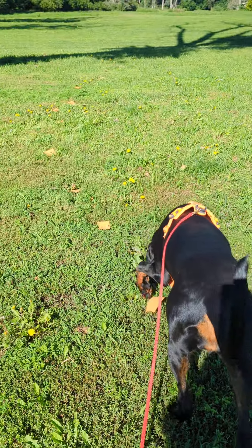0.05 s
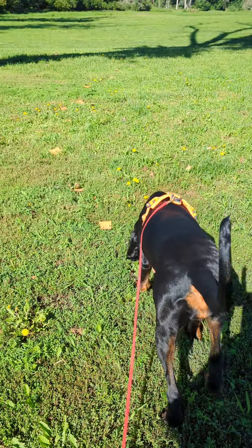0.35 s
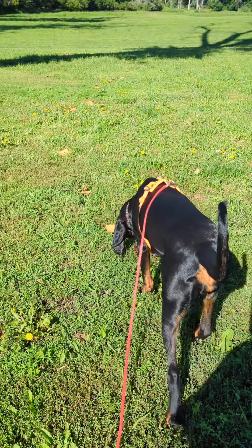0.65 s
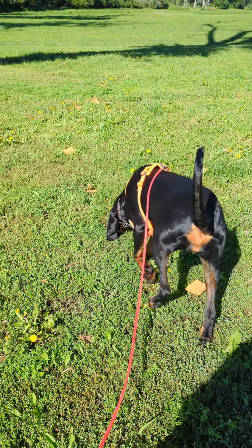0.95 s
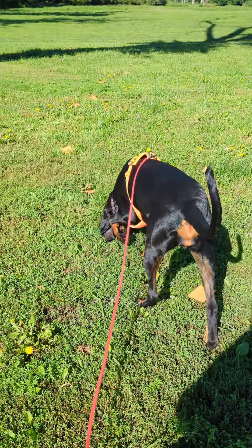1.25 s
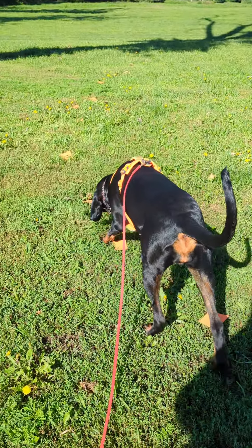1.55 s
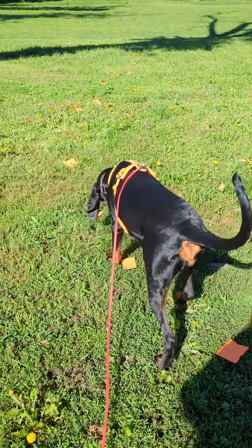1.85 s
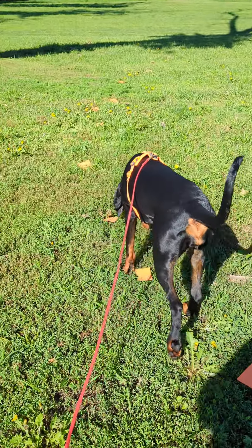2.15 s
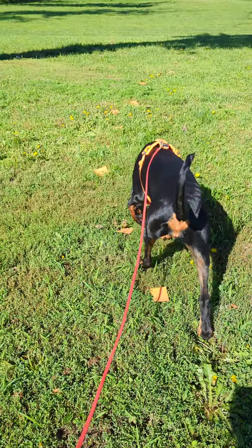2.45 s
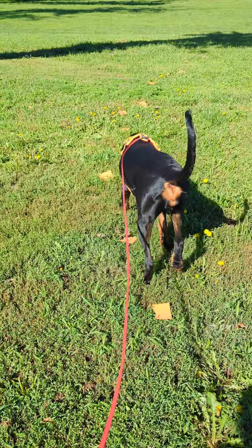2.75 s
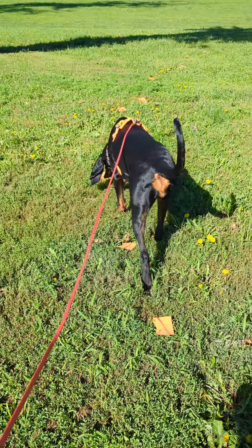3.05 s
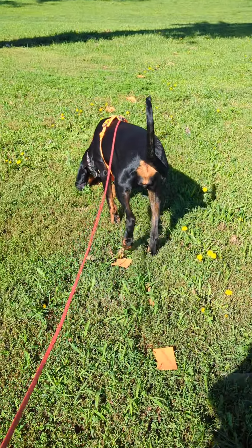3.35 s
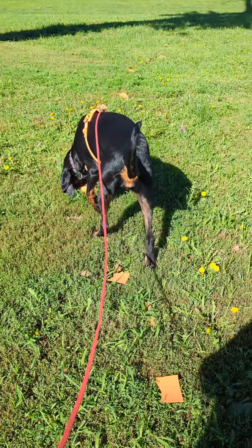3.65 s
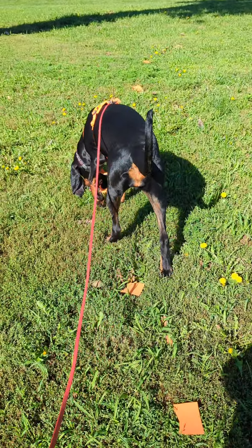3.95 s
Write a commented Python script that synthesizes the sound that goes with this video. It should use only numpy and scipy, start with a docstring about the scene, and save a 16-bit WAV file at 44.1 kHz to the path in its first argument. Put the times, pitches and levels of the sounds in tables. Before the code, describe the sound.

Paws and shoes swish softly through grass throughout, crunching most clearly around 2.2 seconds and again near 3.5. Leash and twigs tick near 0.1, 1.5, 3.3 and 4 seconds. Distant birds chirp early on; a nearer bird gives thin, buzzy whistles at about 2.1 seconds and from 3.1 to 3.4. Faint pulsing insects, light hiss and a steady low town rumble lie behind.

```python
"""A dog is walked across a park lawn: paws and shoes swish through the grass and a few steps crunch,
all made of tiny snaps on friction noise. Leash and twigs tick as short, damped bursts of noise.
A near bird gives thin, buzzy whistles on two gliding voices and one rising note; others chirp far off.
Behind them sit faint pulsing insects, the steady low rumble of the town, and a faint hiss with
continuous grass rustle; the rustle pauses briefly."""
import sys
import numpy as np
from scipy import signal
from scipy.fft import rfft, irfft
from scipy.io import wavfile
from scipy.ndimage import uniform_filter1d

SR = 44100
rng = np.random.default_rng(int(sys.argv[2]) if len(sys.argv) > 2 else 0)


def wrap_up_sound(samples):
    """Save the sound to the file named by the first command line argument, as 16-bit audio."""
    columns = np.atleast_2d(samples).T
    # keep every value between -1 and 1, then stretch to whole-number steps
    tamed = np.clip(columns, -1, 1)
    steps = np.round(tamed * 32767).astype(np.int16)
    wavfile.write(sys.argv[1], SR, steps)


N = 176400
TIME = np.arange(N) / SR

# a leg brushes the grass: middle_s, length_s, stems_db, blades_db
GRASS_SWISHES = [(.285, 0.03, -60.5, -62.5), (0.63, 0.17, -62, -64), (0.797, 0.067, -64.5, -62),
                 (1.113, 0.036, -60.5, -61.5), (1.415, 0.18, -69, -62), (1.905, 0.52, -63, -68),
                 (2.304, .1, -56.5, -54), (2.54, 0.14, -60.5, -64.5), (3.074, 0.19, -61.5, -54),
                 (3.316, 0.11, -62.5, -53.5), (3.58, 0.2, -58, -61.5), (3.933, 0.11, -59.5, -56.5)]
# colour of the dull stems: frequency_hz, gain_db
STEM_EQ = [(900, 0), (2200, 8.5), (8000, 1.5), (14000, -29)]
# colour of the crisp blades: frequency_hz, gain_db
BLADE_EQ = [(5000, -3), (7000, 3.5), (15500, -1)]
# the blades lean right: frequency_hz, left_minus_right_db
BLADE_BALANCE = [(8000, -2), (11000, -8.5)]
# a sole presses the turf: start_s, hold_s, level_db
FOOTSTEPS = [(.02, 0.096, -59), (2.216, 0.034, -49), (2.295, 0.042, -47.5), (2.6, 0.15, -59),
             (3.5, 0.085, -54.5), (3.93, .07, -56.5)]
# colour of the crunch: frequency_hz, gain_db
TURF_EQ = [(400, -2.5), (600, 2.5), (1200, -5), (2200, 0.5), (3200, -13), (7000, -12.5)]
# leash and twigs: start_s, level_db, centre_hz, width_octaves, t60_s
KNOCKS = [(0.13, -44.5, 3300, 2, .025), (1.241, -55, 950, 0.84, 0.059), (1.532, -40.5, 10800, 1.04, 0.014),
          (3.283, -38.5, 620, 0.39, 0.044), (3.962, -41.5, 12600, 0.85, .05)]
# the near bird, one curve per voice of each whistle: time_s, pitch_hz, level_db
WHISTLE_CURVES = [
    [(2.04, 6100, -63.5), (2.09, 7000, -54.5), (2.105, 7850, -50), (2.125, 7900, -41), (2.14, 7450, -57),
     (2.18, 7400, -66)],
    [(2.092, 8800, -61), (2.103, 8150, -45.5), (2.125, 8100, -42.5), (2.14, 8550, -40), (2.18, 8850, -60)],
    [(3.108, 5000, -51), (3.115, 6900, -46), (3.135, 6350, -49), (3.15, 5700, -53.5), (3.185, 5350, -50)],
    [(3.26, 6450, -65.5), (3.33, 6700, -45.5), (3.375, 6650, -38.5), (3.405, 7000, -36), (3.43, 7700, -37)],
    [(3.35, 8850, -56), (3.402, 8600, -47), (3.425, 8400, -35), (3.434, 8350, -52)],
]
# short chirps, distant but for the near bird's last one: start_s, length_s, start_hz, end_hz, level_db
BIRD_CHIRPS = [(0.24, 0.41, 6640, 6150, -68), (0.705, 0.034, 3590, 2630, -53.5),
               (1.028, 0.0083, 5040, 4460, -61), (1.102, 0.012, 5050, 4670, -62),
               (1.222, 0.164, 2400, 2504, -67.5), (1.726, 0.035, 3780, 2510, -56.5),
               (2.912, 0.015, 4460, 5740, -55)]
# insects: pitch_hz, arch_hz, bandwidth_hz, pulse_rate_hz, first_peak_s, sharpness, level_db
CHIRRS = [(9200, 520, 170, 4.16, .055, .6, -75), (8400, 0, 300, 16.667, .015, 4, -71),
          (7600, 0, 260, 16.667, .015, 4, -73)]
# colour of the town rumble: frequency_hz, gain_db
RUMBLE_EQ = [(33, -48), (42, -2), (52, 3), (70, 0), (95, -7), (120, -3.5), (160, -15.5), (255, -24.5),
             (350, -41.5)]
# colour of the far traffic: frequency_hz, gain_db
TRAFFIC_EQ = [(150, 2.5), (290, -27.5)]
# colour of the far low-mid wash: frequency_hz, gain_db
WASH_EQ = [(300, 6.5), (440, 6), (560, 13), (980, 14), (1250, -4)]
# fader ride of that wash: time_s, level_db
WASH_FADER = [(0, -77), (.25, -59), (.57, -58.5), (.95, -68.5), (1.42, -63), (1.7, -70.5), (2.9, -69.5),
              (3.4, -60.5), (4, -58.5)]
# colour of the faint hiss and continuous grass rustle: frequency_hz, gain_db
HISS_RUSTLE_EQ = [(250, -3.5), (420, -5.5), (560, 2.5), (950, -9.5), (1250, -5.5), (8500, -15),
                  (10500, -24), (16000, -22.5)]
# stereo image, centred lows and wide highs: frequency_hz, left_right_correlation
STEREO_IMAGE = [(140, .99), (300, 0.84), (600, 0.037), (1300, -0.065), (4000, -0.096)]


def walking(waver_db=2.0, waver_hz=35):
    """Paws and shoes cross the lawn; swishes and crunches waver in level."""
    return (grass_swishes() + turf_crunches()) * from_db(waver_db * drift(waver_hz))


def grass_swishes(steepness=4.5):
    """Legs rub past dull stems and crisp blades, each swish a bell-shaped swell."""
    power = np.zeros((2, N))
    for middle_s, length_s, stems_db, blades_db in GRASS_SWISHES:
        distance = np.abs(TIME - middle_s) / (length_s / np.sqrt(2))
        power += (from_db([[stems_db], [blades_db]]) / (1 + distance ** steepness)) ** 2
    stems, blades = np.sqrt(power)
    return stems * coloured(crackle(), STEM_EQ) + blades * coloured(crackle(), BLADE_EQ, BLADE_BALANCE)


def turf_crunches(attack_s=.001, release_s=.04):
    """A sole crushes the turf: the crunch bites, holds and dies away."""
    power = np.zeros(N)
    for start_s, hold_s, db in FOOTSTEPS:
        age = TIME - start_s
        envelope = np.clip(age / attack_s, 0, 1) * np.exp(-np.maximum(age - hold_s, 0) / release_s)
        power += (from_db(db) * envelope) ** 2
    return np.sqrt(power) * coloured(crackle(), TURF_EQ) * pan(db=-3)


def crackle(snaps_per_s=1500, spread_db=2.5, friction_share=.4):
    """Dense tiny snaps of uneven size on smooth friction noise."""
    sizes = from_db(spread_db * np.minimum(rng.exponential(1, (2, N)), 5))
    signs = rng.choice([-1, 1], (2, N))
    snaps = rms_one(sizes * signs * (rng.random((2, N)) < snaps_per_s / SR))
    return np.sqrt(1 - friction_share) * snaps + np.sqrt(friction_share) * rng.standard_normal((2, N))


def leash_and_twigs():
    """Small, heavily damped knocks, each a band of noise with a one-cycle attack."""
    out = np.zeros((2, N))
    for start_s, db, hz, octaves, t60_s in KNOCKS:
        edges_hz = np.minimum(hz * 2 ** (np.array([-.5, .5]) * octaves), .45 * SR)
        band = signal.butter(2, edges_hz, "band", fs=SR, output="sos")
        body = rms_one(signal.sosfilt(band, rng.standard_normal((2, N))))
        age = TIME - start_s
        out += body * np.clip(age * hz, 0, 1) * from_db(db - 60 * np.clip(age / t60_s, 0, 3))
    return out


def near_bird(buzz_rate_hz=360, buzz_depth_hz=150, buzz_db=2.5, left_lag_s=.000145):
    """The two sides of the syrinx glide on their own, each with a fast, rough flutter."""
    song = np.zeros(N)
    for curve in WHISTLE_CURVES:
        times, hz, db = np.transpose(curve)
        level = from_db(np.interp(TIME, times, db) + buzz_db * drift(buzz_rate_hz))
        pitch_hz = np.interp(TIME, times, hz) + buzz_depth_hz * drift(buzz_rate_hz)
        gate = uniform_filter1d(1. * ((TIME > times[0]) & (TIME < times[-1])), size=128)
        song += gate * level * tone(pitch_hz)
    direct = pan(db=6) * np.array([np.interp(TIME - left_lag_s, TIME, song), song])
    early_reflections = from_db(-9) * echoes(song, t60_s=.09)
    return direct + early_reflections + from_db(-15) * echoes(song)


def bird_chirps(bend=1.8):
    """Short slurs softened by echoes: mostly distant, plus one rising note from the near bird."""
    song = np.zeros(N)
    flutter = .024 * drift(rate_hz=360) + .012 * drift(rate_hz=25)
    for start_s, length_s, start_hz, end_hz, db in BIRD_CHIRPS:
        progress = np.clip((TIME - start_s) / length_s, 0, 1)
        envelope = 2 * np.sqrt(progress * (1 - progress))
        pitch_hz = end_hz + (start_hz - end_hz) * (1 - progress) ** bend
        song += from_db(db) * envelope * tone(pitch_hz * (1 + flutter))
    return song + from_db(-5) * echoes(song)


def insects(swell_at_s=2.55, swell_width_s=.6, swell_db=6):
    """Faint chirrs in the grass: a slow pulse that arches in pitch and a quick two-band ticking."""
    out = np.zeros((2, N))
    lift_db = swell_db / (1 + ((TIME - swell_at_s) / swell_width_s) ** 2)
    for hz, arch_hz, bandwidth_hz, rate_hz, peak_s, sharpness, db in CHIRRS:
        pulse = np.abs(np.cos(np.pi * rate_hz * (TIME - peak_s)))
        rasp = np.array([drift(bandwidth_hz) for _ in range(2)])
        out += from_db(db + lift_db) * pulse ** sharpness * tone(hz + arch_hz * pulse ** 2) * rasp
    return out


def hiss_and_rustle(pause_at_s=1.06, half_width_s=.25, dip_db=-3.5):
    """Faint hiss and continuous grass rustle; the level dips as the rustle pauses briefly."""
    pause_db = dip_db / (1 + ((TIME - pause_at_s) / half_width_s) ** 10)
    return from_db(-60 + pause_db) * coloured(rng.standard_normal((2, N)), HISS_RUSTLE_EQ)


def town(traffic_start_s=2.92, traffic_rise_s=.64):
    """Steady rumble, far traffic swelling late and a slowly changing wash."""
    colours = (RUMBLE_EQ, TRAFFIC_EQ, WASH_EQ)
    rumble, traffic, wash = (coloured(rng.standard_normal((2, N)), eq) for eq in colours)
    traffic *= np.clip((TIME - traffic_start_s) / traffic_rise_s, 0, 1)
    wash *= from_db(np.interp(TIME, *np.transpose(WASH_FADER)))
    return from_db(-39.5) * rumble + from_db(-47) * traffic + wash


def echoes(x, t60_s=.42):
    """Trees and ground scatter a sound into a short diffuse tail."""
    tail = rng.standard_normal((2, SR)) * from_db(-60 * TIME[:SR] / t60_s)
    return signal.fftconvolve(x[None], rms_one(tail) / np.sqrt(SR), axes=1)[:, :N]


def coloured(source, eq, balance=None):
    """Shape two unrelated signals into stereo of rms 1, rolling off steeply outside the EQ curve."""
    hz = np.arange(N // 2 + 1) * SR / N
    mid, side = rfft(source)
    correlation = at_hz(STEREO_IMAGE, hz)
    polarity = np.array([[1], [-1]])
    stereo = np.sqrt(1 + correlation) * mid + polarity * np.sqrt(1 - correlation) * side
    skirts = np.minimum(1, hz / eq[0][0]) ** 3 * np.minimum(1, eq[-1][0] / (hz + 1)) ** 3
    stereo *= from_db(at_hz(eq, hz)) * skirts
    if balance:
        stereo *= from_db(polarity * at_hz(balance, hz) / 2)
    return rms_one(irfft(stereo, N))


def tone(hz):
    """A sine of rms 1 that follows a pitch."""
    return np.sqrt(2) * np.sin(2 * np.pi * np.cumsum(hz) / SR)


def drift(rate_hz):
    """Smooth random modulation of rms 1."""
    lowpass = signal.butter(2, rate_hz, fs=SR, output="sos")
    return rms_one(signal.sosfilt(lowpass, rng.standard_normal(N + SR))[SR:])


def at_hz(points, hz):
    """Read a curve on a log-frequency axis."""
    frequencies, values = np.transpose(points)
    return np.interp(np.log(hz + 1), np.log(frequencies), values)


def pan(db):
    """Constant-power stereo gains; positive leans left."""
    return rms_one(from_db([[db / 2], [-db / 2]]))


def from_db(db):
    """Decibels to gain."""
    return 10 ** (np.asarray(db) / 20)


def rms_one(x):
    """Scale to rms 1."""
    return x / np.sqrt(np.mean(x ** 2) + 1e-20)


def scene():
    """Lay the walk, the birds and the insects over the bed."""
    bed = town() + hiss_and_rustle()
    return bed + walking() + leash_and_twigs() + near_bird() + bird_chirps() + insects()


def record(dry):
    """A steep high cut on the whole mix."""
    high_cut = signal.ellip(12, .1, 80, 15900, fs=SR, output="sos")
    return signal.sosfilt(high_cut, dry)


dry = scene()
out = record(dry)
wrap_up_sound(out)
```